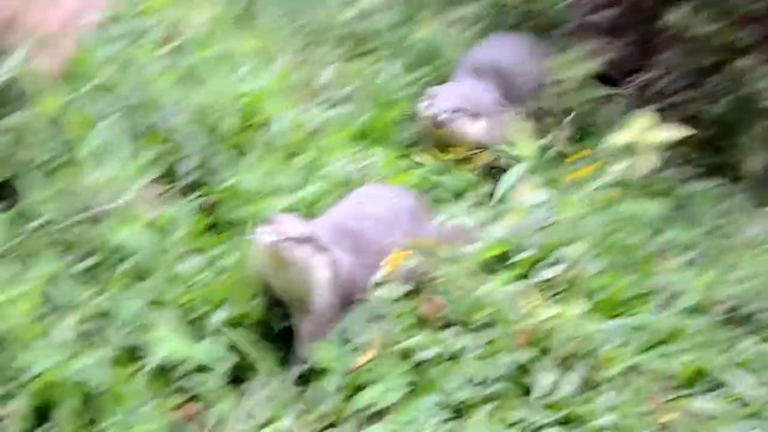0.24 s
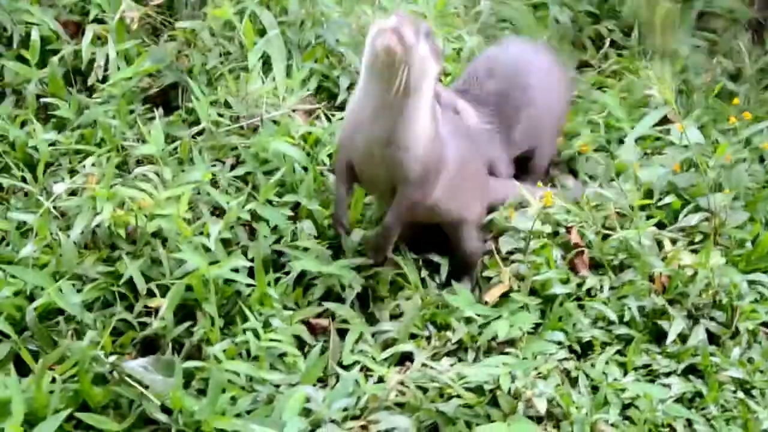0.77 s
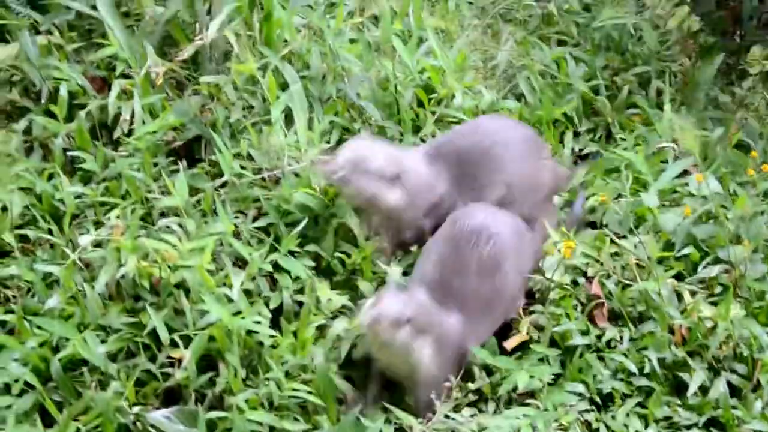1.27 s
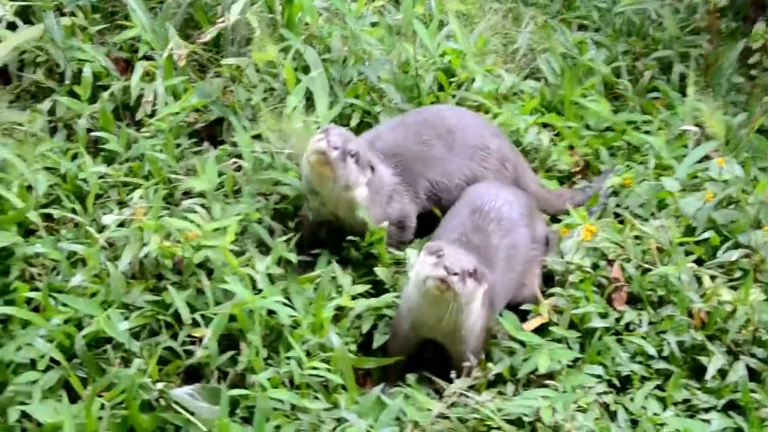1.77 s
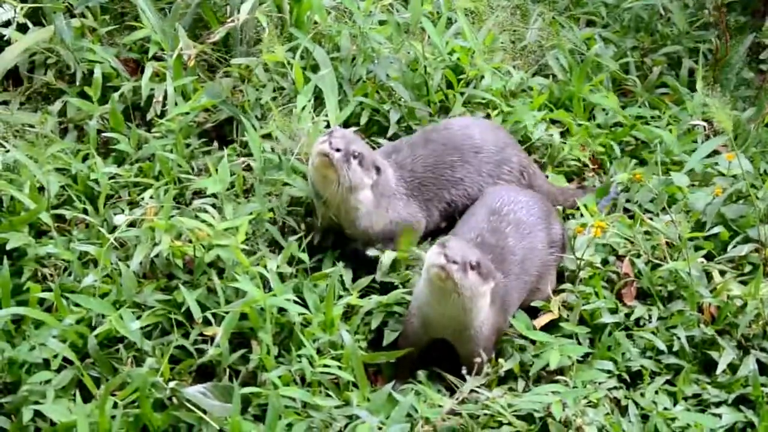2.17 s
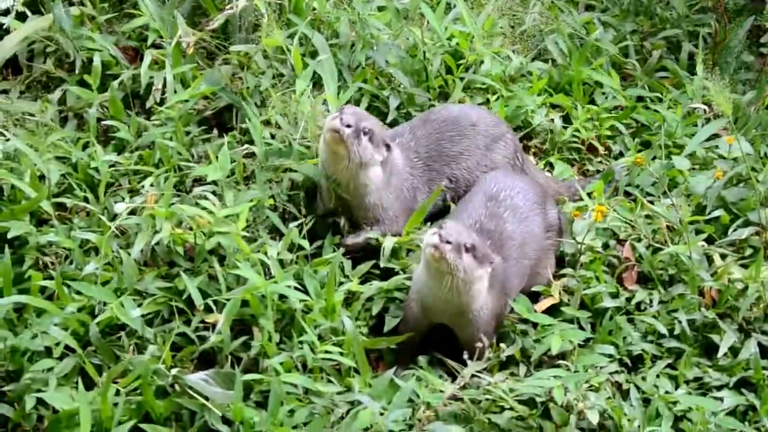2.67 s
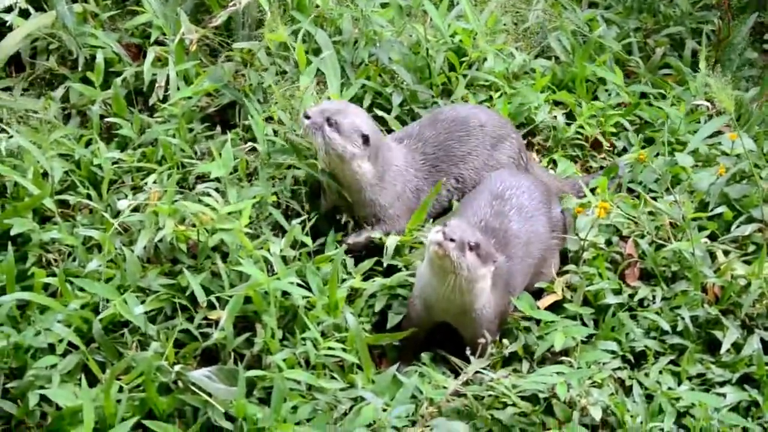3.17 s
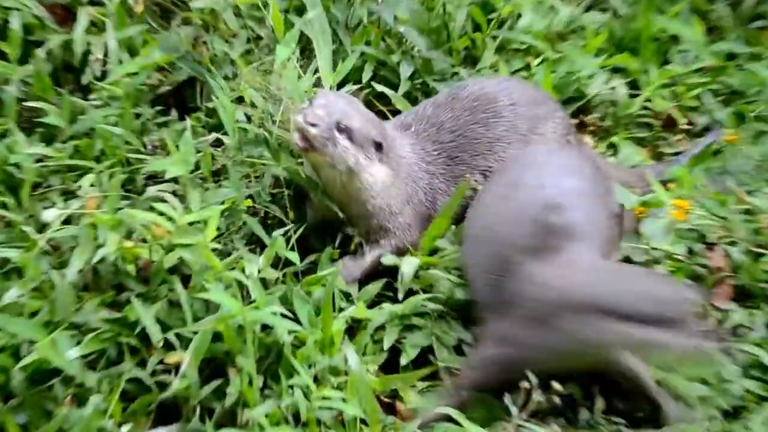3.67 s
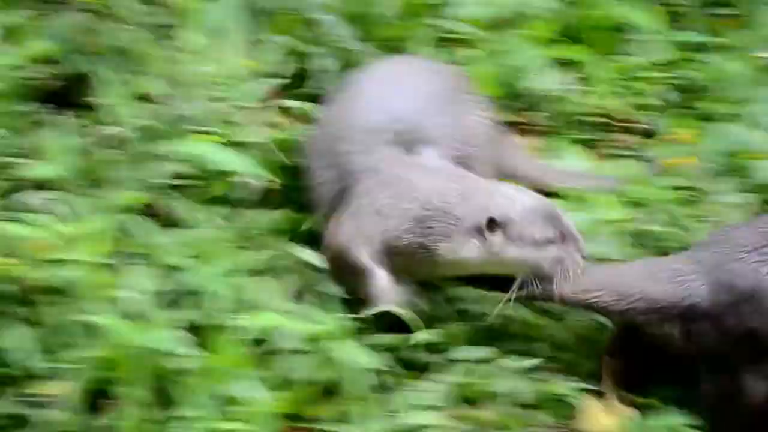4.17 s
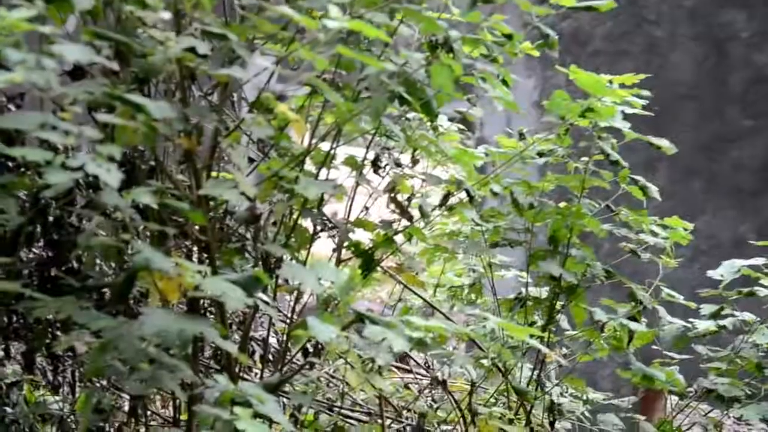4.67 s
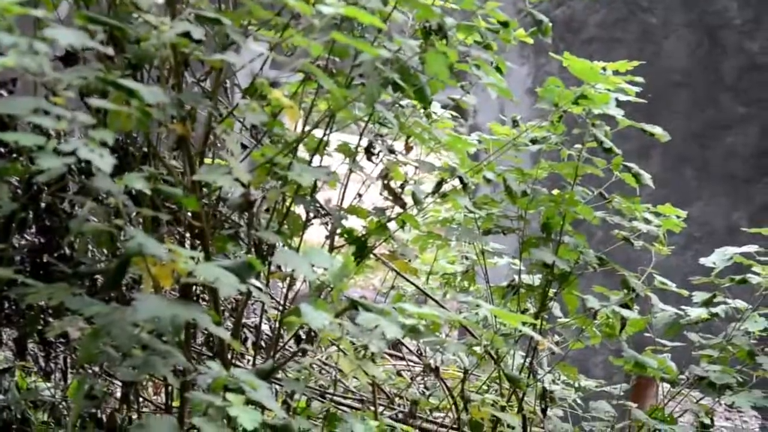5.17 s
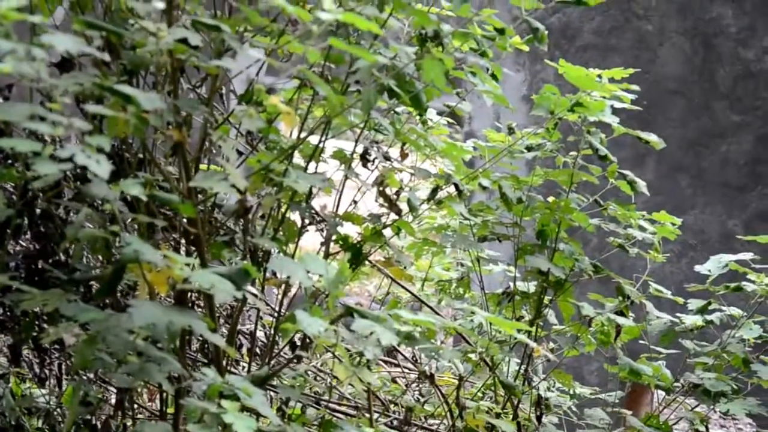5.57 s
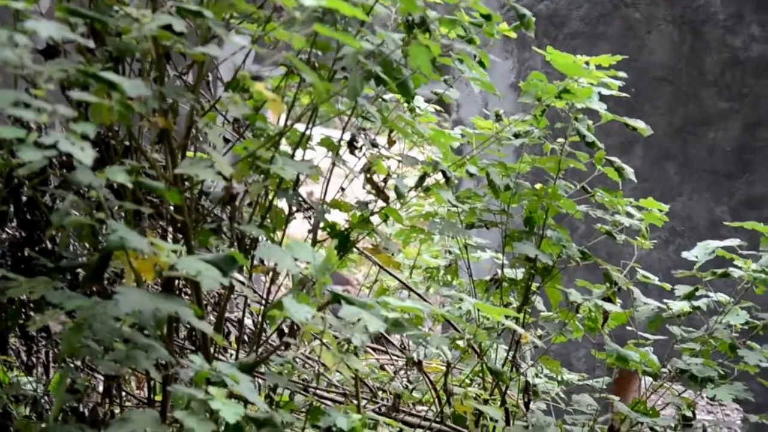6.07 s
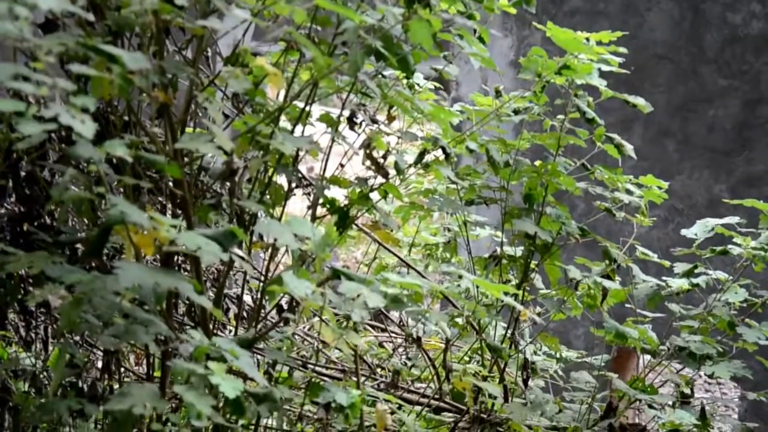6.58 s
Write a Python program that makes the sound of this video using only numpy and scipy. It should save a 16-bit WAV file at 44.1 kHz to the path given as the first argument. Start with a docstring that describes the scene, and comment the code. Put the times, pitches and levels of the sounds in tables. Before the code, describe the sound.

In an outdoor pen, bright piercing otter cries fill the opening, starting high and sagging in pitch, with close wall echoes. They stop, leaving soft hiss, far piping frogs and a few dry snaps. Another squealing burst follows midway with a brief leafy rustle. The ending has no otter cries: faint tones and thin peeps pulse behind hand bumps and scrapes on the handheld camera's mono microphone.

```python
"""Two otters squealing in a pen

Two otters squeal in turn and over each other: wavering partials with breath, echoed by nearby walls.
Behind them are hiss from filtered noise, a far frog chorus of drifting tones, and thin far peeps.
Noise bursts make twigs tick and camera parts clack; grainy noise makes grass rustle.
Hands knock the camera body, which rings in decaying tones, and rub it with more grainy noise."""
import sys
import numpy as np
from scipy import signal
from scipy.fft import rfft, irfft
from scipy.io import wavfile
from scipy.ndimage import uniform_filter1d

SR = 44100
rng = np.random.default_rng(int(sys.argv[2]) if len(sys.argv) > 2 else 0)


def master_out(mix):
    """Clip the mix to full scale and print it as 16-bit PCM to the path in sys.argv[1]."""
    frames = np.transpose(np.atleast_2d(mix))
    ceiling = np.clip(frames, -1, 1)
    pcm = np.round(ceiling * 32767).astype(np.int16)
    wavfile.write(sys.argv[1], SR, pcm)


N = 301552  # length in samples


def undb(db):
    """Turns dB into a plain multiplier."""
    return 10 ** (np.asarray(db) / 20)


def level(x, db):
    """Sets the average (RMS) level of x in dB."""
    return x * undb(db) / np.sqrt(np.mean(x ** 2))


def band(x, lo_hz, hi_hz):
    """Second-order band-pass: keeps the sound between two pitches."""
    edges = [lo_hz, min(hi_hz, .45 * SR)]
    return signal.sosfilt(signal.butter(2, edges, "band", fs=SR, output="sos"), x)


def colour(table, hz):
    """Reads a curve of (Hz, dB) points on a log pitch axis."""
    points_hz, points_db = np.transpose(table)
    return np.interp(np.log(np.maximum(hz, 1)), np.log(points_hz), points_db)


def walk(rate, size=N):
    """Random wandering around zero: values held for 1 / rate seconds, then smoothed twice."""
    hold = int(SR / rate)
    steps = np.repeat(rng.standard_normal(size // hold + 1), hold)
    return uniform_filter1d(uniform_filter1d(steps, hold), hold)[:size]


def add(out, s, x):
    """Mixes x into out from time s in seconds."""
    i = int(s * SR)
    out[i:i + len(x)] += x[:len(out) - i]


# Colour of the outdoor hiss. Each row: pitch in Hz, relative level in dB per Hz.
AIR_COLOUR = [(20, -25), (110, -17), (180, -14), (900, -13.5), (1350, -13.5), (1800, -7), (2400, -13.5),
              (2800, -13), (3100, -17), (5200, -21.5), (9500, -30.5), (11000, -40), (12500, -50),
              (16000, -66)]
# Slow rise and fall of the hiss. Each row: time in seconds, level change in dB.
AIR_SWELL_CURVE = [(0, 4), (1.7, 1), (2.5, -2), (3.4, 2.5), (4.0, -1), (4.46, 3.5), (4.5, 4.5), (5.3, 2.5),
                   (6.2, 7), (6.84, 3)]


def air():
    """Outdoor hiss: coloured noise in overlapping octave bands, each flickering by itself."""
    hz = np.fft.rfftfreq(N, 1 / SR)
    spectrum = rfft(rng.standard_normal(N)) * undb(colour(AIR_COLOUR, hz))
    hiss = 0
    for octave in np.arange(4, 15):  # band centres are powers of two in Hz
        share = np.clip(1 - np.abs(np.log2(hz + 1) - octave), 0, 1)
        hiss = hiss + irfft(spectrum * share, N) * undb(3.3 * walk(6.3))
    swell_db = np.interp(np.arange(N) / SR, *np.transpose(AIR_SWELL_CURVE))
    return level(hiss, -48.0) * undb(swell_db)


# Lines of the far frog chorus. Each row: pitch in Hz, middle level in dB.
# The strongest row takes its level from the bouts below instead.
CHORUS_LINES = [(1416, -65), (1599, -59), (1787, -48), (1981, -58), (2169, -59), (2363, -65), (2783, -57),
                (2845, -63)]
# Bouts of the nearest caller. Each row: middle in seconds, length in seconds, peak in dB before flicker.
NEAREST_BOUTS = [(0.947, 0.059, -57), (1.685, 0.15, -43.5), (2.012, .06, -50), (2.222, 0.28, -45),
                 (2.395, 0.13, -41.5), (2.524, 0.21, -44), (2.774, 0.059, -48), (2.897, .1, -46),
                 (3.126, 0.16, -49), (4.446, 0.29, -47), (4.64, 0.24, -46.5), (4.883, 0.29, -39),
                 (5.124, 0.13, -42.5), (5.292, 0.15, -41.5), (5.4, 0.1, -42.5), (5.595, 0.21, -36.5),
                 (5.815, 0.064, -43), (6.082, 0.26, -41), (6.284, 0.18, -40), (6.493, 0.2, -44),
                 (6.7, 0.21, -39)]
BOUT_EDGE_DB, BOUT_REST_DB = -7.5, -54.5  # change at both ends of a bout; level between bouts


def chorus():
    """Far frogs: drifting pure tones that swell and fade, the strongest one in timed bouts."""
    t = np.arange(N) / SR
    near_db = np.full(N, float(BOUT_REST_DB))
    for s, length, db in NEAREST_BOUTS:
        near_db = np.maximum(near_db, db + BOUT_EDGE_DB * (2 * (t - s) / length) ** 2)
    loudest = max(db for _, db in CHORUS_LINES)
    out = 0
    for hz, db in CHORUS_LINES:
        drift = np.cumsum(13 * walk(50)) / SR  # pitch wander of some Hz, added up into cycles
        line_db = db + 6 * np.tanh(2 * walk(13)) - 1
        if db == loudest:
            line_db = near_db + 3 * walk(60)
        out = out + np.sqrt(2) * undb(line_db) * np.sin(2 * np.pi * (hz * t + drift))
    return out


# Far peeps. Each row: start in seconds, pitch in Hz, peak level in dB before flicker, length in seconds.
FAR_PEEPS = [(2.877, 4400, -49, 0.044), (4.655, 4440, -49, 0.075), (5.43, 4400, -50, 0.09),
             (6.138, 4470, -48, 0.092), (6.582, 2320, -50.5, 0.073), (6.765, 1060, -42.5, 0.015)]


def peeps():
    """Short thin notes from far off: pure tones with rounded ends and a flickering level."""
    out = np.zeros(N)
    for s, hz, db, length in FAR_PEEPS:
        t = np.arange(int(length * SR)) / SR
        swell = np.sin(np.pi * t / length) ** .5
        flicker = undb(3.5 * walk(246, size=len(t)))
        add(out, s, undb(db) * swell * flicker * np.sin(2 * np.pi * hz * t))
    return out


def brushing(table, lo_hz, hi_hz, grain_db):
    """Friction: band-limited noise with a grainy flicker that follows a level curve."""
    s, db = np.transpose(table)
    t = np.arange(s[0], s[-1], 1 / SR)
    grains = rng.standard_normal(len(t)) * undb(grain_db * walk(150, size=len(t)))
    scrape = band(band(grains, lo_hz, hi_hz), lo_hz / 2, hi_hz)
    return level(scrape, 0) * undb(np.interp(t, s, db))


# Twigs and stems snapping. Each row: start in seconds, peak level in dB, centre pitch in Hz,
# time to die away by 60 dB in seconds.
TWIG_TICKS = [(1.679, -18.5, 4700, 0.014), (2.0424, -49.5, 4330, 0.014), (2.0623, -35, 4440, 0.018),
              (2.2547, -39, 6100, 0.015), (2.8817, -13, 4330, 0.015), (3.1102, -33.5, 4430, 0.039),
              (3.1213, -39.5, 4110, 0.014), (3.2974, -29.5, 4930, 0.027), (3.3084, -27.5, 6100, 0.0116),
              (6.13, -23.5, 3540, 0.012), (6.475, -34, 4220, 0.016)]
# Small clacks of camera parts. Each row: start in seconds, peak level in dB, centre pitch in Hz,
# time to die away by 60 dB in seconds.
CAMERA_CLACKS = [(4.533, -34.5, 1757, 0.027), (5.426, -39.5, 2040, 0.0157), (5.4304, -19, 1750, 0.032),
                 (5.6051, -20, 1740, 0.029), (5.782, -19, 2020, 0.026), (5.92, -24, 1240, 0.024),
                 (5.963, -22, 2490, 0.019), (5.9692, -23, 1514, 0.03), (6.231, -22.5, 1250, 0.041),
                 (6.291, -23, 1800, 0.012), (6.2996, -13.5, 1720, 0.022)]
# Bodies brushing through stems, one table a rustle. Each row: time in seconds, level in dB.
GRASS_RUSTLES = [
    [(1.68, -58.5), (1.8, -66.5), (2.0, -85)],
    [(3.93, -48), (4.03, -53), (4.15, -52), (4.25, -57.5), (4.38, -48), (4.46, -48), (4.475, -53)],
]
SNAP_DB, SNAP_S = 3, 0.00041  # extra level at the first crack, and how fast it fades


def ticks():
    """Snaps and clacks: noise bursts with a sharp first crack; grass rustles as friction noise."""
    out, t = np.zeros(N), np.arange(4000) / SR
    for s, db, hz, t60 in TWIG_TICKS + CAMERA_CLACKS:
        fade_db = SNAP_DB * np.exp(-t / SNAP_S) - 60 * t / max(t60, .004)
        burst = rng.standard_normal(len(t)) * undb(fade_db)
        body = band(band(burst, hz / 1.39, hz * 1.58), hz / 3.9, hz * 1.69)
        bright = band(band(burst, hz, 2.8 * hz), hz / 2, 10000)
        snap = body + 0.26 * bright
        add(out, s, snap * undb(db) / np.abs(snap).max())
    for table in GRASS_RUSTLES:
        add(out, table[0][0], brushing(table, 3600, 9900, grain_db=1.5))
    return out


# Blows on the camera body. Each row: start in seconds, peak level in dB,
# time for the push to die away by 60 dB in seconds.
BODY_KNOCKS = [(2.42, -33.5, 0.23), (3.959, -31, 0.3), (4.471, -27, 0.25), (4.534, -25, 0.25),
               (4.598, -40, 0.36), (5.493, -33.5, 0.34), (5.8, -28, 0.14), (5.918, -19, 0.12),
               (5.969, -32, 0.33), (6.174, -36, 0.25), (6.229, -27, 0.66), (6.3, -18.5, 0.2),
               (6.468, -32, 0.065)]
# Ringing tones of the camera body. Each row: pitch in Hz, relative level in dB,
# time to die away by 60 dB in seconds.
BODY_MODES = [(255, -30, 0.013), (367, 8.5, 0.015), (526, 2, 0.017), (690, 1, 0.035), (999, -10, 0.09)]
# Hands shifting on the casing. Each row: time of full grip in seconds, finger scrape level in dB,
# low palm rub level in dB, time to die away by 60 dB in seconds.
HAND_GRIPS = [(2.429, -51, -81, 1.7), (2.629, -49, -74, 1.4), (4.474, -62, -51, 0.83),
              (4.532, -39.5, -66, 0.24), (5.493, -41, -45.5, 0.76), (5.795, -41.5, -45, 1.2),
              (5.916, -37, -36.5, 0.54), (6.09, -40.5, -48.5, 1.6), (6.175, -41, -37.5, 0.55),
              (6.231, -42, -64, 0.34), (6.301, -33, -33, 0.41), (6.469, -51, -48, .25)]
GRIP_ATTACK_S = 0.0055


def grip_curve(s, db, t60):
    """Level curve of one grip: a quick rise, then a steady fall in dB."""
    return [(s - GRIP_ATTACK_S, db - 20), (s, db), (s + t60, db - 60)]


def handling():
    """Knocks: noisy pushes make the camera body ring; grips: finger scrapes and palm rubs fade away."""
    t = np.arange(12000) / SR
    ring = sum(undb(db - 60 * t / t60) * np.sin(2 * np.pi * hz * t) for hz, db, t60 in BODY_MODES)
    out = np.zeros(N)
    for s, db, t60 in BODY_KNOCKS:
        push = band(rng.standard_normal(len(t)) * undb(-60 * t / max(t60, .01)), 234.0, 1030)
        ringing = signal.fftconvolve(push, ring)[:len(t)]
        blow = level(ringing, 0) + level(push, 5.8)
        add(out, s, blow * undb(db) / np.abs(blow).max())
    for s, scrape_db, rub_db, t60 in HAND_GRIPS:
        scrape = brushing(grip_curve(s, scrape_db, t60), 170, 4070, grain_db=3.5)
        rub = brushing(grip_curve(s, rub_db, t60), 72, 466, grain_db=3.0)
        add(out, s - GRIP_ATTACK_S, scrape + rub)
    return out


TOP_HZ = 15800  # partials stop here, and so does the microphone
END_SAG, END_SAG_S = .08, 0.0081  # share of the pitch lost as the breath runs out, and how quickly
JITTER = .0025  # fast random waver, as a share of the pitch
SHIMMER_DB, RASP_DB = 3.5, 3.0  # slow and fast flicker of the partials, scaled by partial number
# Effort tilts the voice about the pivot, but no further above the tilt top.
PIVOT_HZ, TILT_TOP_HZ = 2500, 8920
MOUTH_HZ, MOUTH_OCTAVES = 4060, 0.48  # centre and spread of the band that the mouth lifts or lowers
SHADOW_HZ, SHADOW_DB = 3900, -41  # a faint tone follows the fifth partial, this far below it
BREATH_DB, AIRY_DB = -32, -41  # breath under the voice, and thin breath among the high partials
ONSET_DB, ONSET_S = 14, 0.018  # extra breath as the vocal folds catch, and how fast it fades


def squeal(table, quaver, throat):
    """Partials of an unsteady pitch, coloured by throat and mouth, plus breath that bursts at the start."""
    s, *controls = np.transpose(table)
    t = np.arange(s[0], s[-1], 1 / SR)
    hz, first_db, level_db, tilt_db, mouth_db = (np.interp(t, s, c) for c in controls)
    steady = hz * (1 - END_SAG * np.exp((t - s[-1]) / END_SAG_S))
    hz = steady * (1 + quaver * walk(55, size=len(t)) + JITTER * walk(300, size=len(t)))
    phase = 2 * np.pi * np.cumsum(hz) / SR
    voice = np.zeros(len(t))
    for k in range(1, 19):
        partial_hz = k * steady
        effort_db = tilt_db * np.log2(np.minimum(partial_hz, TILT_TOP_HZ) / PIVOT_HZ)
        mouth_shape = np.exp(-(np.log2(partial_hz / MOUTH_HZ) / MOUTH_OCTAVES) ** 2)
        db = level_db + colour(throat, partial_hz) + effort_db + mouth_db * mouth_shape
        if k == 1:
            db = first_db  # the fundamental has its own level
        if k == 5:
            shadow = np.sin(5 * phase - 2 * np.pi * SHADOW_HZ * t)
            voice += np.sqrt(2) * undb(db + SHADOW_DB) * shadow
        shimmer = min(k / 6, 1) * SHIMMER_DB * walk(35, size=len(t))
        rasp = min((k / 7) ** 2, 1.6) * RASP_DB * walk(350, size=len(t))
        gain = np.sqrt(2) * undb(db + shimmer + rasp) * (k * hz < TOP_HZ)
        voice += gain * np.sin(k * phase + k ** 2)  # k ** 2 spreads the starting phases
    loud = np.sqrt(uniform_filter1d(voice ** 2, size=400))
    breath_db = BREATH_DB + ONSET_DB * np.exp((s[0] - t) / ONSET_S)
    breath = level(band(rng.standard_normal(len(t)), 1800, 6000), 0)
    voice += loud * undb(breath_db) * breath
    airy = band(band(rng.standard_normal(len(t)), 5000, 9000), 4500, 11000)
    voice += loud * level(airy, AIRY_DB)
    return voice * np.clip(np.minimum((t - s[0]) / 0.00091, (s[-1] - t) / 0.0014), 0, 1)


# One table a squeal. Each row: time in seconds, pitch in Hz, fundamental level in dB,
# overtone level in dB, effort as a tilt in dB per octave, mouth resonance in dB.
SQUEAL_TABLES = [
    [(0.0, 998, -42, -12.5, 1.5, -21), (0.024, 985, -24.5, -13, 2, -11),
     (0.052, 925, -31.0, -13, -2, -11.5), (0.116, 883, -58, -19, 3.5, -7), (0.128, 849, -43, -14, 5, -8),
     (0.188, 912, -42.5, -13.5, 2, -3), (0.24, 896.4, -38, -11.5, 2, -11.5),
     (0.292, 869, -43, -13.5, 5, -4.5), (0.36, 901, -44.0, -12, 6.5, -8.5), (0.436, 856, -48, -21, 8.5, 1),
     (0.512, 876.8, -42, -20.5, 12, 5.5), (0.612, 826.7, -36, -21, 8, -3), (0.688, 901, -31, -20, -27, 3),
     (0.732, 862, -30, -30.5, -12, 9)],
    [(0.31, 1340, -48, -32, 10, -3), (0.336, 1063, -23.5, -50, -6, 5), (0.418, 999, -36, -44, 8, 1),
     (0.49, 957, -27, -48, 5.5, -3.0), (0.574, 937.5, -31.5, -41.5, -3, -8.5),
     (0.637, 999, -36, -29.5, 4.5, 0), (0.715, 1110, -25.5, -37.5, 5.5, 9.5),
     (0.739, 1070, -30.5, -35, 8.5, 4.5), (0.829, 1050, -33.5, -34.0, 4.5, 20),
     (0.859, 967, -30, -50, 11.5, -8)],
    [(0.984, 1523, -39, -23, -11.5, 11.5), (1.0, 1340, -28.5, -13, -8, -7),
     (1.024, 1330, -31, -4.5, -16, -20), (1.028, 1237, -36, -19.5, -4.5, -5.5),
     (1.044, 1131, -29.5, -33.5, 5.5, 9), (1.1, 1092, -24.5, -29, 2.5, -3.5),
     (1.16, 1039, -25.5, -37.5, 0.0, -0.5), (1.18, 994, -18.5, -60, -7, -2),
     (1.208, 1008, -24.5, -44, 11, 9), (1.228, 960, -31, -35, 10, 0)],
    [(1.197, 1278, -36, -20.5, -8, 0.5), (1.217, 1057, -28, -5.5, -1, -6.5),
     (1.241, 948.6, -38, -7, -4, -4), (1.285, 928, -34.5, -18, 3, -11.5),
     (1.337, 893, -42, -25.5, 5.5, -4.5), (1.377, 886, -37, -21, 4, -9),
     (1.405, 832, -37.5, -21.5, -3.5, 0.5), (1.469, 813, -40.5, -18.5, -6.0, -5),
     (1.533, 798, -40, -15.5, -4, -16.0), (1.581, 773.4, -38, -20, -0.5, -7),
     (1.621, 732, -52.5, -32.5, -4.5, -4.5)],
    [(2.398, 1552, -40, -63.5, -5, -5.0), (2.415, 1019, -29, -59.5, -11, -2.5),
     (2.429, 860, -35, -64, -16, -11), (2.458, 790, -50.5, -75.5, -6.5, -10.5)],
    [(3.43, 1533, -42, -54, -6.0, -8), (3.451, 1336, -30, -20, -14, -11), (3.475, 1308, -38, -25, -8, -14),
     (3.496, 1156, -43.5, -31.5, 2, -4), (3.55, 1191, -48, -21, -0.5, 3),
     (3.574, 1230, -35, -26.0, -10, 18), (3.643, 1149, -26.5, -35, 4.5, 19),
     (3.814, 1093, -55, -40.5, 9.5, -4), (3.889, 1112, -35.5, -32.5, 4, -14),
     (3.931, 1638, -47.5, -21, -20, -6.5), (3.961, 1410, -38, -18.5, -21, -9.5),
     (4.021, 1275, -39.5, -30, -11, -15), (4.069, 1347, -41, -36.5, -9, -9),
     (4.099, 1153, -35.5, -53, -3, -1), (4.135, 1544, -49, -45, -6.0, -3), (4.18, 1040, -30, -55, -6.0, -1),
     (4.219, 968, -48, -75, -4, -5.0)],
    [(3.515, 1250, -26.5, -26.5, 8, 5), (3.527, 1184, -36, -14.5, -6, -18),
     (3.547, 1034, -36.5, -13, -0.5, -5), (3.587, 1004, -28, -8.5, 2, -17),
     (3.611, 969, -34.5, -9.5, -1.5, -8.0), (3.663, 889, -38, -20, 5.5, 4),
     (3.703, 871.3, -32.5, -21, 9.5, -1), (3.755, 839.5, -34, -22, 8.5, 0.5),
     (3.811, 823.8, -37.5, -19, 5, 2.5), (3.839, 830, -39, -20, 5, 6.5), (3.903, 814.3, -41, -17.5, 0, 0),
     (3.951, 760, -42.5, -25, -3, -25)],
]
# Slow waver of each squeal, as a share of its pitch.
SQUEAL_QUAVERS = [.013, .007, .005, .003, .004, .009, .005]
# Which otter gives each squeal, 0 or 1.
SQUEAL_SINGERS = [0, 1, 1, 0, 1, 1, 0]
# Throat colour of the overtones, one table an otter. Each row: pitch in Hz, level change in dB.
OTTER_THROATS = [
    [(1400, -9.5), (2000, -13), (2600, 1.5), (3300, -7), (4200, -1.0), (5200, -15.5), (6300, -23),
     (8000, -35), (10000, -46.5), (12500, -59), (16000, -61)],
    [(1400, 10), (2000, 15), (2600, -2), (3300, 1.5), (4200, -6), (5200, -8.5), (6300, -16.5),
     (8000, -19.5), (10000, -36.5), (12500, -49), (16000, -40)],
]
# Brief drops and surges in the squeals' level. Each row: middle in seconds, level change in dB.
LEVEL_BUMPS = [(.999, -1), (1.026, -9), (1.033, 9), (1.2095, 5.5), (1.217, 0), (1.231, -14.5), (3.489, 8.5),
               (3.492, -2), (3.519, -2), (3.534, 7), (3.54, 2)]
BUMP_S = 0.0034  # how far a bump spreads to each side
# Echoes from ground, shrubs and the nearest wall. Each row: delay in seconds, level in dB.
EARLY_ECHOES = [(.0047, -20), (.0083, -21.5), (0.0122, -8.5)]
# Build-up of the scattered echo, its 60 dB die-away times, and its level in dB.
WALL_S, WALL_T60_S, LEAF_T60_S, WALL_DB = 0.013, 0.44, 0.25, -15  # leaves soak up the treble sooner


def otters():
    """Squeals with brief level changes, then near echoes and a scattered noise echo from the pen walls."""
    dry = np.zeros(N)
    for table, quaver, who in zip(SQUEAL_TABLES, SQUEAL_QUAVERS, SQUEAL_SINGERS):
        add(dry, table[0][0], squeal(table, quaver, OTTER_THROATS[who]))
    clock = np.arange(N) / SR
    bump_db = sum(db * np.exp(-((clock - s) / BUMP_S) ** 2) for s, db in LEVEL_BUMPS)
    dry = dry * undb(bump_db)
    t = np.arange(SR) / SR
    echo = band(rng.standard_normal(SR), 800, 2200) * undb(-60 * t / WALL_T60_S)
    echo += band(rng.standard_normal(SR), 3200, 15000) * undb(-60 * t / LEAF_T60_S)
    echo *= np.clip(t / WALL_S, 0, 1)
    echo /= np.sqrt(np.sum(echo ** 2))
    out = dry + undb(WALL_DB) * signal.fftconvolve(dry, echo)[:N]
    for late, db in EARLY_ECHOES:
        add(out, late, undb(db) * dry)
    return out


def scene():
    """Adds all the layers into one channel."""
    return (air() + chorus() + peeps() + ticks() + handling() + otters())[None]


MIC_BEND = 0.034
MIC_NOTCH_HZ, MIC_NOTCH_Q = 5650.5, 21.4


def record(dry):
    """The microphone bends loud waves, so voices make difference tones; its port has a notch; the top is cut."""
    bent = dry + MIC_BEND * (dry ** 2 - uniform_filter1d(dry ** 2, size=300))
    notched = signal.lfilter(*signal.iirnotch(MIC_NOTCH_HZ, MIC_NOTCH_Q, fs=SR), bent)
    heard = 0.17 * bent + 0.7 * notched  # the unfiltered share keeps the notch shallow
    return signal.sosfilt(signal.ellip(10, .2, 80, TOP_HZ, fs=SR, output="sos"), heard)


dry = scene()
out = record(dry)
master_out(out)
```